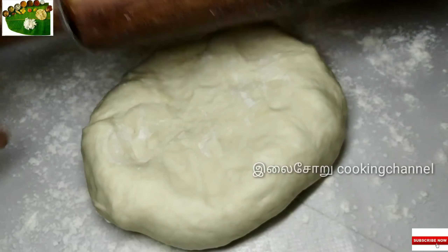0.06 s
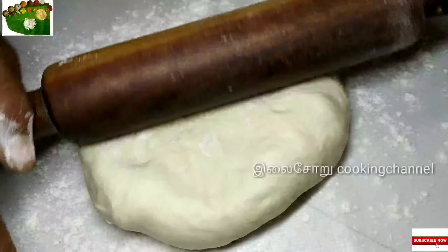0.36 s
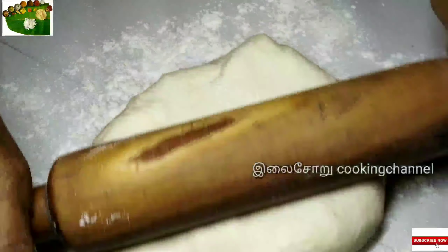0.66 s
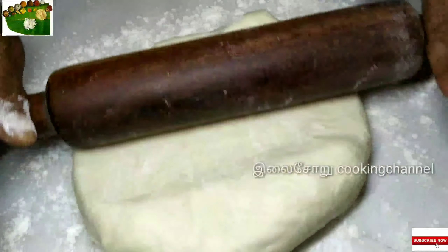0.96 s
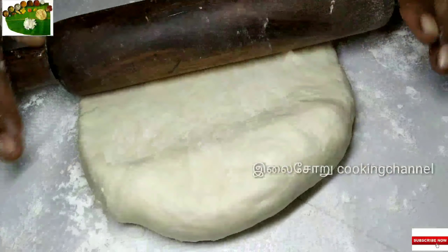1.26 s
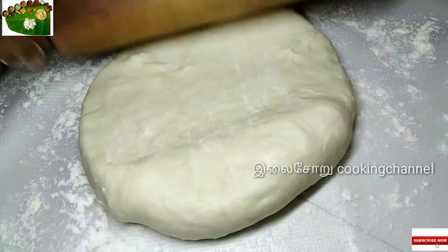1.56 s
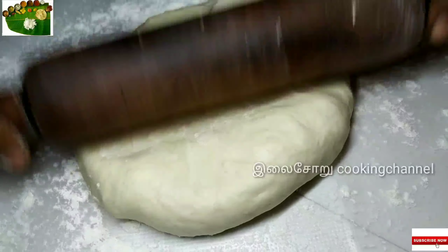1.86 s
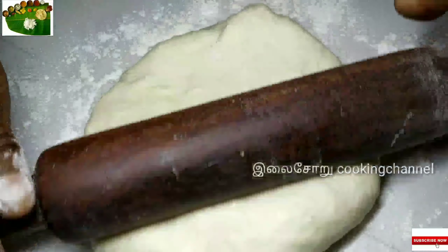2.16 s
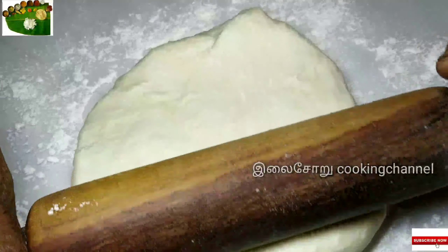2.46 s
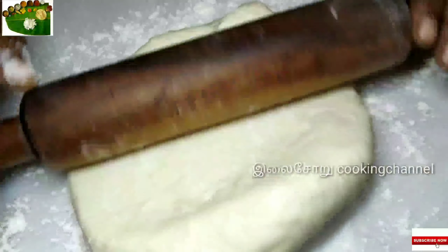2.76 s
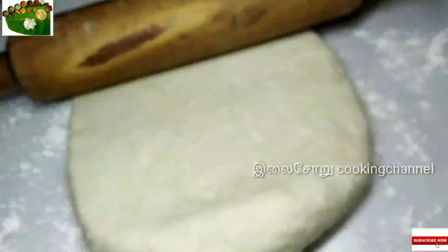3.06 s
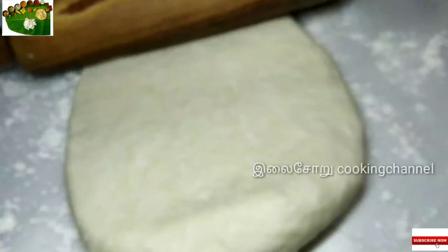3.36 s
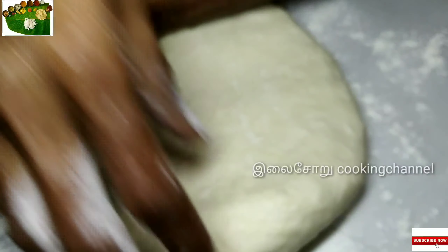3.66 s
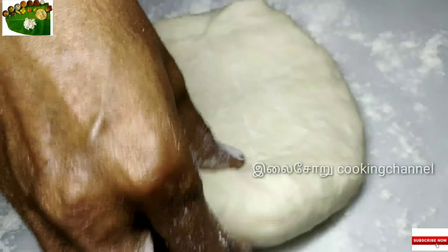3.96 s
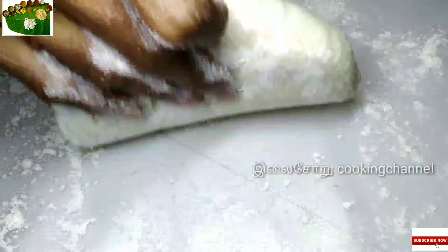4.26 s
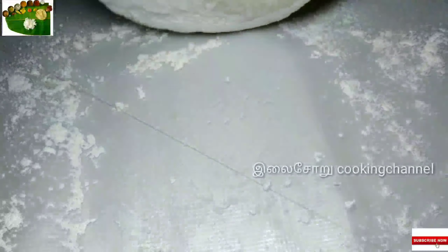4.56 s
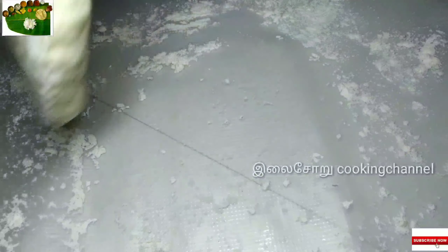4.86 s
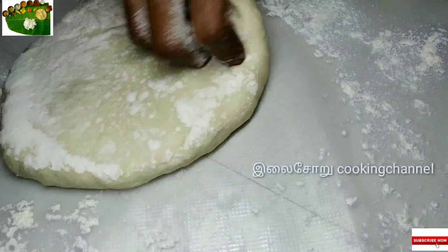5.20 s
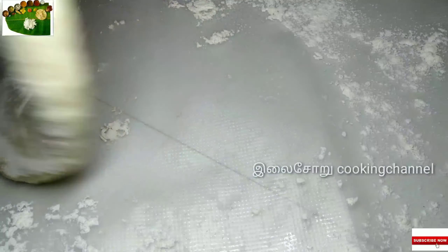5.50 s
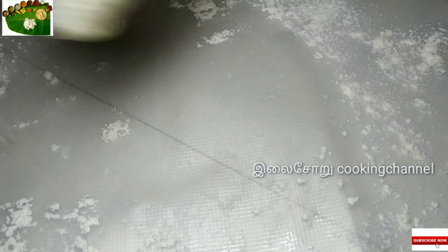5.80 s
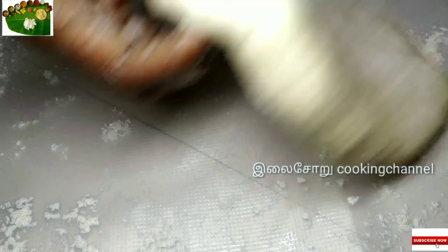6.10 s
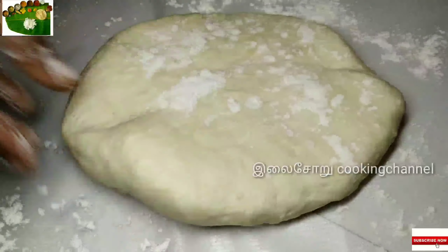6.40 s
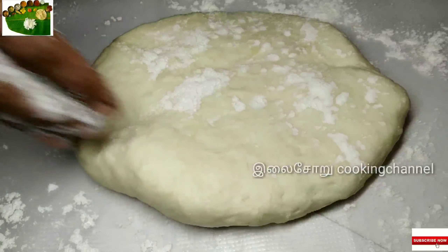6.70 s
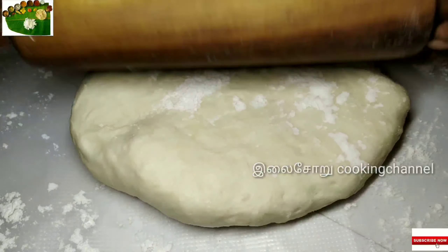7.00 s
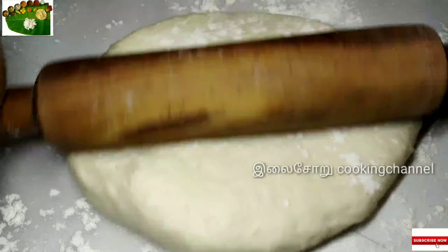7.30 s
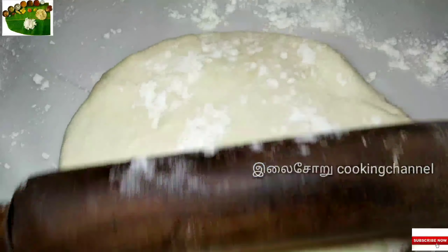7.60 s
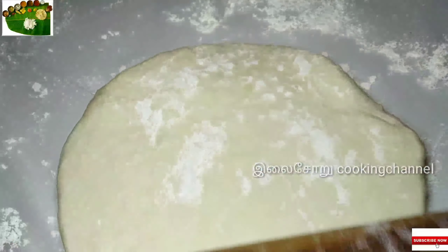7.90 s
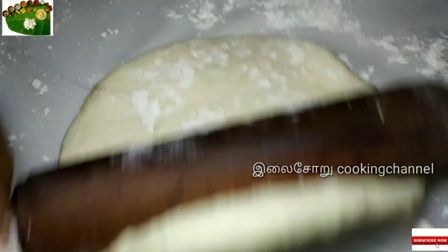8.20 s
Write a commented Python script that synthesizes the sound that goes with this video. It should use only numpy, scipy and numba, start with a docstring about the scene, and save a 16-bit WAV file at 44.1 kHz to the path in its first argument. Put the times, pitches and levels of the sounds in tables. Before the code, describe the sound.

Close up in a kitchen, a wooden rolling pin rolls dough on a floured counter in uneven strokes, with a soft hiss, gritty scrapes, small clicks and a few sharp clacks. The pin is put down with light knocks. The dough is turned with a soft flap and sticky crackles, then rolled again. Faint metal clinks come now and then, and a distant motor throbs louder toward the end over a steady low hum.

```python
"""A wooden rolling pin flattens dough on a floured counter, close up; the dough is lifted, turned and
rolled again. Flour slips under pin and hands as a bright hiss and a gritty scrape, dotted with clicks.
The dough flaps down on trapped air; the pin clacks and is put down with light knocks; small metal
(bangles, perhaps) clinks. Behind it, a distant motor throbs and slowly grows over low kitchen rumble,
mains hum and one faint passing whine."""
import sys
import numpy as np
from scipy import signal
from scipy.fft import rfft, irfft, next_fast_len
from scipy.io import wavfile
from scipy.ndimage import uniform_filter1d
from numba import njit

SR = 44100
rng = np.random.default_rng(int(sys.argv[2]) if len(sys.argv) > 2 else 0)


def dump_mix(stems):
    """Bounce the given channels to the path in sys.argv[1] as a 16-bit WAV at rate SR."""
    frames = np.atleast_2d(stems).T  # one column per channel
    limited = np.clip(frames, -1, 1)  # hard clip at full scale
    pcm = np.round(limited * 32767).astype(np.int16)
    wavfile.write(sys.argv[1], SR, pcm)


N = 372644
T = np.arange(N) / SR

# Rubs on flour: rolling to and fro, turning the dough, rolling again with one hard last push.
# Columns: t/s at full speed, attack/s, hold/s, release/s, relative level/dB, scrape offset/dB
FLOUR_RUBS = [ (0.028, 0.054, .01, 0.12, -43.5, -8), (0.153, .05, 0.0084, 0.15, -49, -2),
              (0.356, 0.29, 0.074, 0.14, -50, -5.5), (0.697, 0.11, 0.059, 0.086, -35.5, -6.5),
              (1.058, 0.23, 0.074, 0.45, -41.5, 0.5), (1.17, 0.16, 0.1, 0.09, -40.5, -8),
              (1.317, .05, 0.027, 0.039, -46, -5), (1.478, 0.012, 0.004, 0.16, -44, 1),
              (1.945, 0.28, 0.16, 0.19, -50.5, -15), (2.135, 0.092, 0.081, .1, -41, -1),
              (2.245, 0.034, 0.0068, 0.14, -33.5, -1), (2.519, 0.12, 0.024, 0.032, -50, -9),
              (2.763, 0.1, 0.026, 0.17, -41.5, -1), (2.902, 0.017, 0.014, 0.18, -55.5, 11),
              (3.132, 0.88, 0.18, 0.18, -52.5, -10), (3.418, 0.037, 0.032, 0.21, -58.5, 8),
              (3.69, .02, 0.037, 0.13, -60.5, 6), (3.875, 0.21, .01, 0.089, -54.5, -23),
              (3.965, 0.027, 0.0054, 0.052, -42.5, -3), (4.094, 0.088, 0.0047, 0.055, -45, -3),
              (4.185, 0.037, 0.14, .15, -47, -1.5), (4.387, 0.27, 0.1, 0.012, -42.5, -0.5),
              (5.077, 0.016, .005, 0.018, -34.5, 2.5), (5.122, 0.027, 0.016, 0.085, -33.5, 0),
              (5.378, 0.09, 0.065, 0.11, -46, -1.5), (6.263, 0.036, 0.014, 0.015, -26, -0.5),
              (6.3, 0.21, 0.17, 0.27, -43.5, 0), (6.388, 0.032, 0.041, 0.022, -42, 8),
              (6.687, 0.052, 0.057, 0.19, -56.5, 6), (7.106, 0.24, .02, 0.14, -53, -16),
              (7.296, 0.13, 0.18, 0.24, -48.5, -24), (7.368, 0.015, 0.018, 0.07, -50.5, 12.5),
              (7.587, 0.58, 0.22, 0.35, -42.5, -3), (8.171, 0.071, 0.048, 0.076, -33, 0),
              (8.282, 0.073, 0.034, 0.28, -35.5, -0.5)]
# Resonance of the scrape, deeper where the contact is broad and pressed hard: t/s, f/Hz
SCRAPE_RESONANCE = [(.75, 3420), (1.05, 2770), (1.35, 3160), (2.25, 3550), (2.85, 2710), (3.37, 3340),
                    (4.4, 3340), (6.3, 2970), (7.4, 2980), (8.1, 2360), (8.207, 2300), (8.29, 2520)]
# EQ of the flour hiss: f/Hz, relative level/dB
FLOUR_EQ = [(300, -15), (1500, -13), (2500, -33), (3600, -24), (4300, 1), (5500, -0.5), (7500, 1),
            (10500, 4), (12500, -0.5), (15000, -7), (16500, -33)]
# Louder clicks of pin and sticky dough: t/s, relative snap level/dB, relative body level/dB, body f/Hz
CONTACT_CLICKS = [(0.625, -53, -48, 3500), (0.713, -39, -48, 4500), (0.734, -43, -40, 4300),
                  (0.779, -39, -58, 3500), (1.0455, -46, -33.5, 2730), (1.073, -52, -35.5, 2880),
                  (1.078, -51, -36, 2700), (1.111, -54, -40.5, 3400), (1.1735, -51, -38, 3300),
                  (1.197, -51, -42, 2420), (1.2725, -51, -45, 4400), (1.482, -41, -43, 3300),
                  (1.591, -43, -48, 3270), (1.921, -43.5, -48, 2600), (2.188, -44, -36, 3840),
                  (2.231, -19, -42, 4300), (2.2328, -20.5, -23, 4000), (2.249, -48, -36, 3000),
                  (2.271, -33, -36, 3800), (2.762, -54, -41.5, 3000), (2.875, -48, -33, 3300),
                  (3.3638, -36, -35, 4230), (3.453, -60, -38, 3800), (3.965, -42, -43, 2820),
                  (4.097, -44, -51.5, 3500), (4.191, -47, -43, 3970), (4.306, -42, -42.5, 3800),
                  (4.38, -42, -44, 3200), (4.41, -44, -39, 3500), (4.446, -45, -39, 3000),
                  (5.0835, -27, -37, 4380), (5.122, -30, -51, 3200), (5.133, -33, -41, 3800),
                  (6.2545, -39, -38, 2700), (6.268, -32, -34, 2930), (6.2805, -22.5, -28, 3200),
                  (6.285, -26, -32, 2800), (6.303, -34, -44, 3500), (6.364, -30, -42, 3000),
                  (6.377, -21, -30.5, 2600), (6.393, -37, -33, 3100), (6.4112, -30, -40, 2900),
                  (6.419, -29, -43, 3000), (6.4238, -19.5, -30, 2790), (6.4675, -34, -35, 3580),
                  (6.475, -33, -36, 3600), (6.4878, -24.5, -33, 2620), (6.564, -38.5, -38, 3760),
                  (6.7135, -36.5, -34, 3223), (7.362, -33, -31.5, 3260), (7.3715, -53, -37, 3800),
                  (7.397, -57, -40.5, 2907), (7.432, -48, -40.5, 2860), (7.57, -42, -40, 3700),
                  (7.595, -24.5, -32, 2880), (7.649, -49, -39, 3300), (7.757, -44, -42, 3165),
                  (7.789, -38, -31, 3100), (7.7975, -25.5, -33, 3100), (7.823, -53, -37, 2700),
                  (7.866, -40.5, -45, 3190), (7.883, -46, -37, 2860), (7.891, -55, -40, 2800),
                  (7.957, -55, -43, 2600), (7.969, -47, -40, 2970), (7.982, -42.5, -38.5, 2400),
                  (8.023, -38.5, -36, 2490), (8.1495, -41, -29.5, 2306), (8.171, -36, -36, 2960),
                  (8.205, -32, -22.5, 1860), (8.218, -45, -28, 2200), (8.249, -48, -35, 1970),
                  (8.276, -43, -35, 2700), (8.2922, -29, -33, 2590), (8.313, -54, -33.5, 2500)]
# Dough peeling off and flapping onto the counter: t/s, relative level/dB, decay/s, hollow f/Hz
DOUGH_FLAPS = [(5.1191, -35.5, 0.015, 1150), (6.393, -40, 0.0055, 1300), (7.596, -31, 0.0059, 1820),
               (7.8, -41.5, 0.024, 1500), (8.148, -31, 0.008, 1400), (8.182, -37, 0.015, 1400),
               (8.204, -26, 0.012, 1480), (8.291, -35.5, 0.046, 1610)]
# EQ of the soft thud under each flap: f/Hz, relative level/dB
THUD_EQ = [(200, -9), (550, 2), (900, -2), (1500, -18), (3000, -14), (12000, -31)]
# Hard clacks of the pin: t/s, relative level/dB, ring time multiple, tilt/(dB per octave)
PIN_CLACKS = [(1.1738, -36.5, .8, -9), (1.591, -39, .8, 5), (1.9215, -41, .9, 5), (2.2333, -17, .65, -1),
              (2.8752, -35.5, .9, -5), (3.3643, -22.5, .75, -1)]
# Short ring of the pin itself: f/Hz, relative level/dB, t60/s at ring multiple 1
PIN_MODES = [(3410, -2, .018), (3800, -10, 0.015), (4260, -0.5, 0.012), (5440, -1, .016), (6000, -2, .012),
             (7030, -3, 0.017), (8550, -11, .01), (10850, -3.5, .012), (13000, -13, .01)]
# Light knocks on the counter: t/s, relative level/dB, ring time multiple, tilt/(dB per octave)
COUNTER_KNOCKS = [(1.975, -36.5, .6, -4), (3.409, -30.5, .7, 2), (3.672, -30.5, .75, 0)]
# Ring of the pin on the counter: f/Hz, relative level/dB, t60/s at ring multiple 1
COUNTER_MODES = [(308, -11, 0.044), (417, -3, 0.021), (520, -2, 0.032), (630, -15, 0.018), (764, -5, 0.048),
                 (820, -2, 0.048), (1310, -3.5, 0.037), (1590, -3, 0.039), (1910, -6.5, 0.11),
                 (2050, -1, 0.036), (2530, -1, 0.014), (3000, 1.5, 0.03), (4160, 1, 0.0099)]
# Clinks, some rattling on: t/s, relative level/dB, ring time multiple, tilt/(dB per octave)
METAL_CLINKS = [(1.948, -48.5, 1, -2), (1.957, -46.5, .9, -1), (1.967, -49, .8, -1), (2.004, -63, 1.5, 8),
                (2.657, -46, .6, 5), (7.044, -45, .8, 2), (7.0475, -45, .8, 2), (7.053, -53, 1, 11)]
# Ring of the metal, with close pairs that beat: f/Hz, relative level/dB, t60/s at ring multiple 1
METAL_MODES = [(5800, -1, .04), (6060, 4, 0.049), (7009, -1, .065), (9450, -11, .04), (9690, -1, 0.061),
               (10210, -2, .06), (10950, -7, .03), (11290, -3.5, 0.11), (11400, 3.5, 0.07),
               (11600, -10, .035), (12800, -3, 0.076), (13400, -5, .055)]
# The motor's two tones, drifting apart and swelling in turn: t/s, f/Hz, level/dB
MOTOR_UPPER_TONE = [(0, 94.3, -52), (3.7, 94, -57), (4.2, 94.1, -47.5), (4.8, 94, -51.5),
                    (5.4, 93.8, -39.5), (5.8, 94.3, -46), (6.4, 94.6, -43.5), (6.9, 95.15, -35),
                    (7.3, 95.2, -41), (7.6, 95.4, -36), (8.05, 95.5, -32), (8.45, 94.1, -40.5)]
MOTOR_LOWER_TONE = [(0, 89, -75), (3.9, 86.5, -57), (4.8, 86, -40.5), (5.35, 86, -68), (5.9, 85.2, -44),
                    (6.25, 85, -59), (6.7, 84, -53), (7.2, 83.2, -67), (7.6, 82.56, -38.5),
                    (8.05, 82.1, -47), (8.45, 80.6, -55)]
# Swell of the motor's rumble: t/s, level/dB
MOTOR_SWELL = [(0, -79), (5.5, -59), (6.25, -57), (6.6, -47), (7.1, -49.5), (7.35, -40.5), (7.7, -48),
               (8.45, -47)]
# Steady hums of mains and appliances: f/Hz, level/dB
HUM_TONES = [(60, -65.5), (99.8, -62), (139, -60), (151, -59), (200.3, -54)]
# EQs of the room tone, low rumble and airy hiss: f/Hz, relative level/dB
RUMBLE_EQ = [(22, -34), (36, -15.5), (50, -19), (62, 0), (90, -1), (116, -6.5), (143, -7), (172, -5.5),
             (200, -2.5), (235, -8.5), (310, -10.5), (470, -15.5), (640, -23), (900, -45)]
AIR_EQ = [(450, -27), (680, -1), (810, 2), (1120, 1), (1450, -4), (2100, -4.5), (3000, -7), (4500, -15.5),
          (7000, -18), (10000, -15), (14500, -34), (16000, -45)]
# Stereo width of the room tone: f/Hz, side minus mid level/dB
ROOM_WIDTH = [(60, -15), (125, -16), (250, -16), (500, -7), (1000, -1), (4000, 1), (12000, -1)]


def rolling():
    """Slips and clicks under pin and hands sound twice: as bright hiss and through the contact's resonance."""
    hiss_db, scrape_db = rub_envelopes()
    pitch_hz, = curves(SCRAPE_RESONANCE)
    # Crushed crumbs: lone ticks in both the hiss and the scrape.
    crumbs = undb(scrape_db - 9.5) * flour_grind(per_s=80, spread_db=1, grain_s=.00055, rush=0)
    hiss = undb(hiss_db) * flour_grind(per_s=500, spread_db=3.5, grain_s=.0012, rush=.5)
    hiss += undb(-8) * crumbs
    scrape = undb(scrape_db - 2.5) * flour_grind(per_s=490, spread_db=2, grain_s=.0023, rush=.53)
    scrape += crumbs
    snaps, bodies = clicks(list(CONTACT_CLICKS) + crackles(scrape_db, pitch_hz))
    # The point of contact keeps shifting, and the resonance with it.
    wander_hz = pitch_hz * 2 ** (.15 * drift(per_s=70))
    body = bodies + np.array([resonate(channel, wander_hz, width=1) for channel in scrape])
    # So small a contact radiates hardly any bass.
    body = signal.sosfilt(signal.butter(2, 1100, "high", fs=SR, output="sos"), body)
    bright = undb(-1.43) * pan(hiss, left_db=2) + undb(-.5) * pan(snaps, left_db=2.5)
    return counter_reflection(equalise(bright, FLOUR_EQ) + undb(-.5) * pan(body, left_db=2.5))


def rub_envelopes(slope_db=20):
    """Hiss and scrape levels in dB: each rub gains slope_db over its attack and loses it over its release."""
    hiss_power = scrape_power = 1e-12
    for start, attack_s, hold_s, release_s, db, scrape_offset_db in FLOUR_RUBS:
        before = np.maximum((start - T) / attack_s, 0)
        after = np.maximum((T - start - hold_s) / release_s, 0)
        power = undb(db - slope_db * np.minimum(before + after, 10)) ** 2
        hiss_power += power
        scrape_power += power * undb(scrape_offset_db) ** 2
    return 10 * np.log10(hiss_power), 10 * np.log10(scrape_power)


def flour_grind(per_s, spread_db, grain_s, rush):
    """Tiny uneven slips catch and let go over a smooth rush, given as a share of their power; rms 1."""
    slips = rng.random(N) < per_s / SR
    sizes = slips * undb(spread_db * np.minimum(rng.exponential(size=N), 4))
    power = signal.lfilter([1], [1, -np.exp(-1 / (grain_s * SR))], sizes ** 2)
    envelope = np.sqrt(power / power.mean() + rush)
    return unit(stereo_noise(N, shared=.016) * envelope * undb(.76 * drift(per_s=110)))


def crackles(scrape_db, pitch_hz, per_s=26):
    """Cues for faint random clicks that ride the level and pitch of the scrape."""
    chance = rng.random((int(per_s * N / SR), 4))
    times = chance[:, 0] * T[-1]
    scatter = 2 * chance[:, 1:].T - 1
    snap_db, body_db = np.interp(times, T, scrape_db) + 2.5 * scatter[:2]
    hz = np.interp(times, T, pitch_hz) * 2 ** (.25 * scatter[2])
    return list(zip(times, snap_db - 13, body_db - 3.5, hz))


def clicks(events, rise_s=.0003, snap_decay_s=.0014, body_decay_s=.0024):
    """Each click is a burst of uneven micro-cracks: a brief snap and a longer, pitched body."""
    snaps, bodies, t = np.zeros((2, N)), np.zeros((2, N)), T[:SR // 20]
    scale = np.sqrt(.01 * SR / len(t))  # sets the rms over 10 ms
    attack = (1 - np.exp(-t / rise_s)) ** 2
    crack_times = np.linspace(0, t[-1], 70)
    for start, snap_db, body_db, hz in events:
        cracks = attack * undb(3.5 * np.interp(t, crack_times, rng.standard_normal(len(crack_times))))
        snap = cracks * np.exp(-t / snap_decay_s) * stereo_noise(len(t), shared=.084)
        push = cracks * np.exp(-t / body_decay_s) * stereo_noise(len(t), shared=.24)
        body = np.array([resonate(channel, hz, width=.79) for channel in push])
        add(snaps, start, undb(snap_db) * scale * unit(snap))
        add(bodies, start, undb(body_db) * scale * unit(body))
    return snaps, bodies


def counter_reflection(x, lag_s=.0012, gain=.65):
    """A bounce off the counter; its path changes as pin and hands move, so the colour shifts."""
    echo = np.array([np.interp(T - lag_s * np.exp(.3003 * drift(per_s=3)), T, side) for side in x])
    return (x + gain * echo) / np.sqrt(1 + gain ** 2)


def dough_flaps(rise_s=.00015):
    """Soft flaps of dough, panned right; the air trapped under each gives it a hollow pitch."""
    envelope, t = np.zeros((2, N)), T[:SR // 4]
    for start, db, decay_s, _ in DOUGH_FLAPS:
        flap = (1 - np.exp(-t / rise_s)) * np.exp(-t / decay_s)
        add(envelope, start, undb(db) * np.tile(flap, (2, 1)))
    pocket_hz = curves(DOUGH_FLAPS)[-1]
    puffs = envelope * stereo_noise(N, shared=.49)
    hollow = np.array([resonate(channel, pocket_hz, width=.69) for channel in puffs])
    thud = equalise(envelope * stereo_noise(N, shared=.47), THUD_EQ)
    return pan(hollow + undb(-11.5) * thud, left_db=-7)


def pin_clacks():
    """The hard wood of the pin gives a sharp crack and a short, high ring."""
    return pan(strikes(PIN_CLACKS, PIN_MODES, crack_db=-4.5, crack_s=.0011, detune=.025), left_db=2.5)


def counter_knocks():
    """The pin meets the counter; dusted wood makes a soft contact, which dulls the crack."""
    knocks = undb(-2.5) * strikes(COUNTER_KNOCKS, COUNTER_MODES, crack_db=6, crack_s=.0036, detune=.015)
    return signal.sosfilt(signal.butter(2, 4500, fs=SR, output="sos"), knocks)


def metal_clinks():
    """Small metal pieces touch and ring, their close modes beating."""
    return undb(6) * strikes(METAL_CLINKS, METAL_MODES, crack_db=-7, crack_s=.0036, detune=.0021)


def strikes(events, modes, crack_db, crack_s, detune):
    """Each hit is a noise crack plus the object's modes, slightly varied; the grip sets the ring time."""
    out, t = np.zeros((2, N)), T[:SR // 4]
    hz, db, t60 = np.transpose(modes)[:, :, None]
    octaves = np.log2(hz) - np.log2(hz).mean()
    for start, level_db, ring_multiple, tilt_db in events:
        angle, spread, scatter_db, mistune = rng.standard_normal((4, len(modes), 1))
        phase = np.pi * angle + .5 * np.array([spread, -spread])
        envelope = undb(db + tilt_db * octaves + scatter_db - 60 * t / (t60 * ring_multiple))
        ring = envelope * np.sin(2 * np.pi * hz * (1 + detune * mistune) * t + phase)
        crack = undb(crack_db) * np.exp(-t / crack_s) * stereo_noise(len(t), shared=.079)
        add(out, start, undb(level_db) * (ring.sum(axis=1) + crack))
    return out


def kitchen_reverb(x, tail_db=-11.5, t60_s=.3):
    """A short, faint room tail behind the direct sound, which reaches the right side first."""
    t = T[:SR // 2]
    tail = unit(rng.standard_normal((2, len(t))) * undb(-60 * t / t60_s))
    response = undb(tail_db) * tail / np.sqrt(len(t))
    response[0, 11] += 1  # left arrives 11 samples late
    response[1, 0] += 1
    return signal.fftconvolve(x, response, axes=1)[:, :N]


def motor(rumble_hz=68):
    """The distant motor throbs as two tones beat, over a narrow rumble and its octave."""
    rumble_db, = curves(MOTOR_SWELL)
    rumble = unit(resonate(rng.standard_normal(N), rumble_hz, width=.22))
    octave = unit(resonate(rng.standard_normal(N), 2 * rumble_hz, width=.26))
    throb = motor_tone(MOTOR_UPPER_TONE) + motor_tone(MOTOR_LOWER_TONE)
    return throb + undb(rumble_db) * (rumble + undb(-5) * octave)


def motor_tone(rows):
    """One gliding tone of the motor, wavering a little as it swells and fades."""
    hz, db = curves(rows)
    return undb(db + 1.1 * drift(per_s=13)) * np.sqrt(2) * np.sin(2 * np.pi * np.cumsum(hz) / SR)


def room_tone():
    """A steady kitchen bed: low rumble, nearly mono, under wide airy hiss."""
    rumble = undb(-45 + .12 * drift(per_s=3.2)) * equalise(rng.standard_normal((2, N)), RUMBLE_EQ)
    air = undb(-55 + .35 * drift(per_s=24)) * equalise(rng.standard_normal((2, N)), AIR_EQ)
    mid, side = rumble + air
    side = equalise(side, ROOM_WIDTH, keep_power=False)
    return mid + np.array([side, -side])


def mains_hum():
    """Mains and appliances hum in the centre, each tone wavering in level and phase."""
    hum = np.zeros(N)
    for hz, db in HUM_TONES:
        amplitude = np.sqrt(2) * undb(db + 1.24 * drift(per_s=8.3))
        hum += amplitude * np.sin(2 * np.pi * hz * T + .41 * drift(per_s=5))
    return hum


def whine(peak_s=5.7, swell_s=.35, hz=3270, level_db=-71):
    """A thin, unsteady whine somewhere in the kitchen swells and fades once."""
    swell = np.exp(-((T - peak_s) / swell_s) ** 2)
    return undb(level_db) * swell * unit(resonate(rng.standard_normal(N), hz, width=.02))


def undb(db):
    """Decibels to gain."""
    return 10 ** (np.asarray(db) / 20)


def unit(x):
    """Scale to rms 1."""
    return x / np.sqrt(np.mean(x ** 2))


def curves(rows):
    """Automation lanes: each column after t/s, joined by straight lines."""
    times, *columns = np.transpose(rows)
    return [np.interp(T, times, column) for column in columns]


def equalise(x, points, keep_power=True):
    """Minimum-phase EQ through (f/Hz, level/dB) points; keep_power holds white noise at its level."""
    size = next_fast_len(N + 8192, True)
    hz, db = np.transpose(points)
    gain = undb(np.interp(np.log(np.fft.rfftfreq(size, 1 / SR) + 1), np.log(hz), db))
    cepstrum = irfft(np.log(unit(gain) if keep_power else gain), size)
    cepstrum[1:size // 2] *= 2
    cepstrum[size // 2 + 1:] = 0
    return irfft(rfft(x, size) * np.exp(rfft(cepstrum)), size)[..., :N]


@njit
def bandpass(x, hz, width):
    """Sweepable state-variable band-pass; width is a share of the centre frequency."""
    y, band_state, low_state = np.empty(len(x)), 0., 0.
    for i in range(len(x)):
        g = np.tan(np.pi * hz[i] / SR)
        band = (band_state + g * (x[i] - low_state)) / (1 + g * (g + width))
        band_state = 2 * band - band_state
        low_state += 2 * g * band
        y[i] = width * band
    return y


def resonate(x, hz, width):
    """A steep resonance, still or swept, under which white noise keeps its power."""
    hz, width = hz * np.ones(len(x)), float(width)
    return bandpass(bandpass(x, hz, width), hz, width) * np.sqrt(2 * SR / (np.pi * hz * width))


def drift(per_s):
    """Smooth random modulation with rms 1."""
    step = int(SR / per_s)
    return unit(uniform_filter1d(np.repeat(rng.standard_normal(N // step + 2), step), step)[:N])


def pan(x, left_db):
    """Set the left channel left_db above the right."""
    return x * undb(np.array([[left_db], [-left_db]]) / 2)


def stereo_noise(size, shared):
    """White noise with a share of its power common to both channels."""
    centre = np.sqrt(shared) * rng.standard_normal(size)
    return centre + np.sqrt(1 - shared) * rng.standard_normal((2, size))


def add(out, start_s, sound):
    """Mix a short stereo sound in at start_s."""
    i = int(start_s * SR)
    out[:, i:i + sound.shape[1]] += sound[:, :N - i]


def scene():
    """Close work on the counter, with a touch of reverb, over the kitchen bed."""
    hits = counter_knocks() + pin_clacks() + metal_clinks()
    foreground = kitchen_reverb(rolling() + dough_flaps() + hits)
    return foreground + room_tone() + mains_hum() + motor() + whine()


def record(dry):
    """A steep high cut at 16 kHz."""
    return signal.sosfilt(signal.ellip(8, .2, 70, 16000, fs=SR, output="sos"), dry)


dry = scene()
out = record(dry)
dump_mix(out)
```